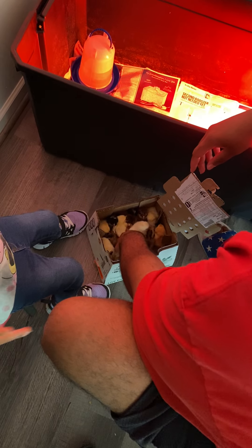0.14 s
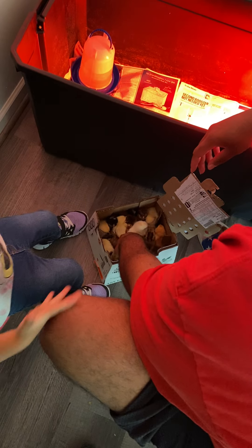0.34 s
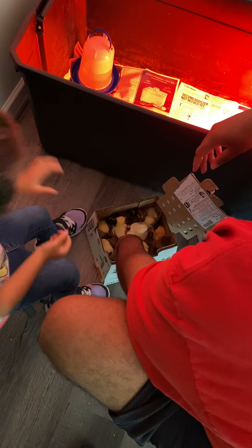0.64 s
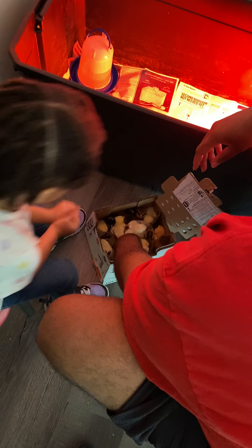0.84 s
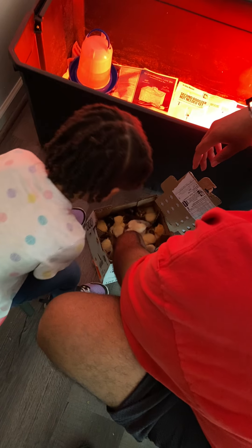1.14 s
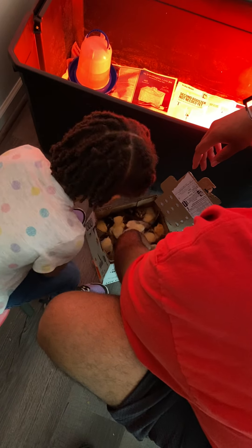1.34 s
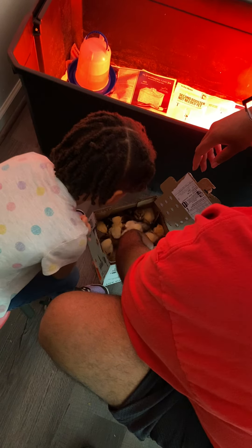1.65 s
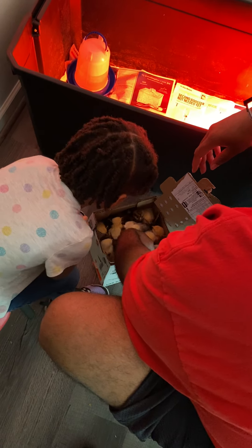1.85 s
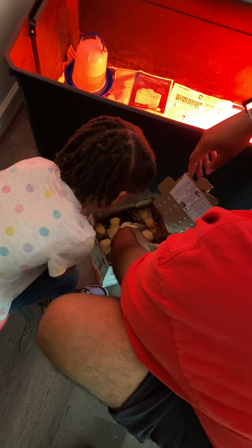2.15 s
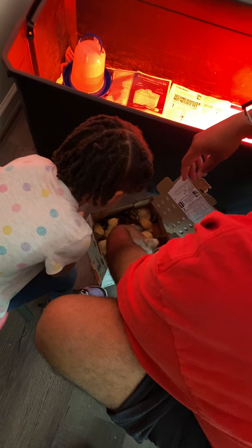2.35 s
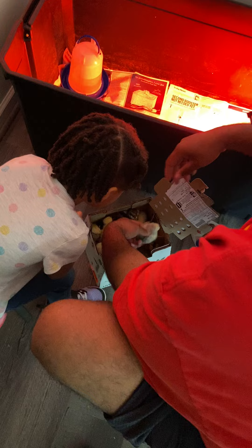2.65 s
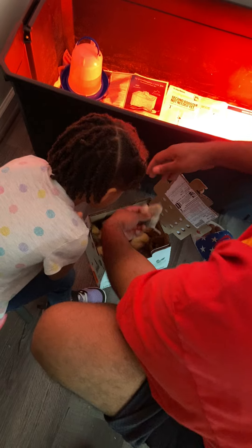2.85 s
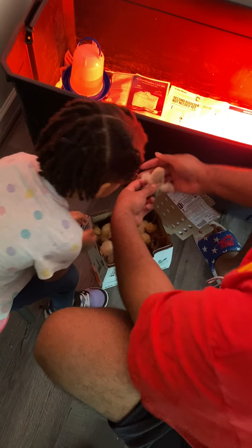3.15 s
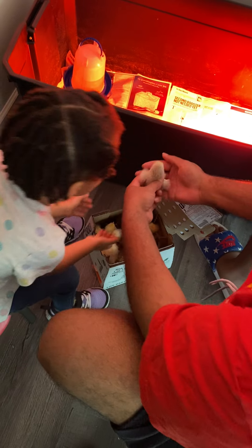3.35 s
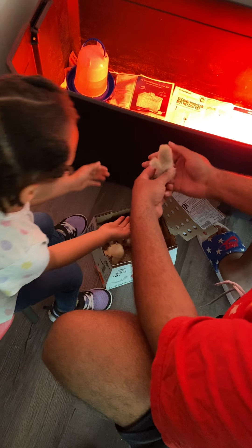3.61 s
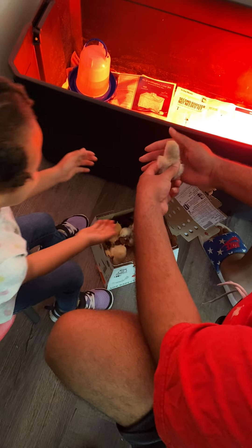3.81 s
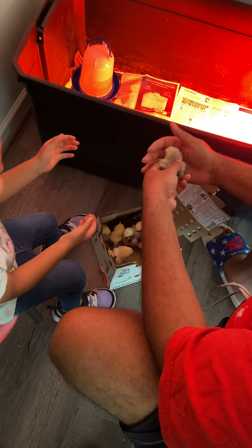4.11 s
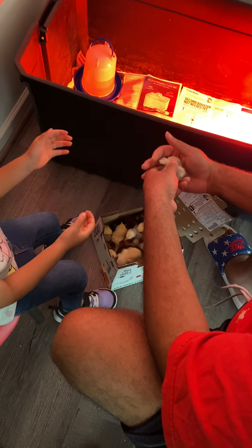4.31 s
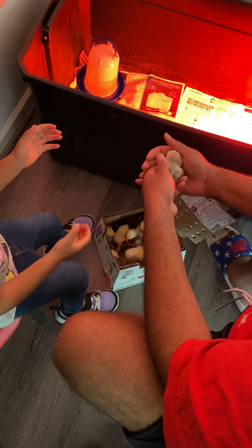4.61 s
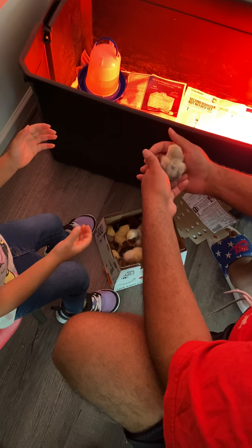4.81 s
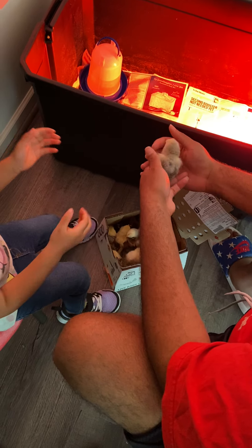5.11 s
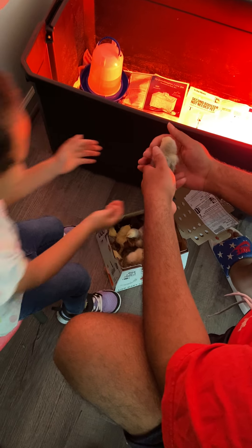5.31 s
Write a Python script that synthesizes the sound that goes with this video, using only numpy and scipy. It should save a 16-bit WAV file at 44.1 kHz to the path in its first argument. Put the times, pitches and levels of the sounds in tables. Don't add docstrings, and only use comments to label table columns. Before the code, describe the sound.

Many tiny chicks cheep shrilly over one another in a small room while feet shuffle, cardboard scrapes and something thumps dully.

```python
import sys
import numpy as np
from scipy import signal
from scipy.fft import rfft, irfft
from scipy.io import wavfile
from scipy.ndimage import uniform_filter1d

SR = 44100
rng = np.random.default_rng(int(sys.argv[2]) if len(sys.argv) > 2 else 0)


def wrap_up_sound(samples):
    columns = np.atleast_2d(samples).T
    tamed = np.clip(columns, -1, 1)
    steps = np.round(tamed * 32767).astype(np.int16)
    wavfile.write(sys.argv[1], SR, steps)


def volts_from_db(level):
    exponent = np.asarray(level, float) / 20
    return 10 ** exponent


N = 241182


def in_time(rows):
    s, *columns = np.transpose(rows)
    return [np.interp(np.arange(N) / SR, s, c) for c in columns]


def at_hz(points, hz):
    point_hz, level_db = np.transpose(points)[:2]
    return np.interp(np.log(hz + 1), np.log(point_hz), level_db)


def rms_one(x):
    return x / np.sqrt(np.mean(x ** 2) + 1e-20)


def band(x, low_hz, high_hz):
    return signal.sosfilt(signal.butter(2, [low_hz, high_hz], "band", fs=SR, output="sos"), x)


def drift(rate_hz, size=N):
    steps = rng.standard_normal(N // 8)
    return np.interp(np.arange(size) * rate_hz / SR, np.arange(len(steps)), steps) * np.sqrt(1.5)


def pair(middle, other, spread_db):
    side = volts_from_db(spread_db) * band(other, 420, 9500)
    return np.array([middle + side, middle - side])


def air():
    # f/Hz, level/dB per Hz
    air_colour = [(25, -17), (60, 9.5), (300, -11), (520, -16.5), (1200, -36), (2300, -37)]
    hz = np.fft.rfftfreq(N, 1 / SR)
    middle, other = irfft(rfft(rng.standard_normal((2, N))) * volts_from_db(at_hz(air_colour, hz)), N)
    hum_hz = 335 + 2.0 * drift(24.39)
    hum_db = -62.5 + 0.74 * drift(17.0)
    hum = np.sin(2 * np.pi * np.cumsum(hum_hz) / SR) * volts_from_db(hum_db)
    return volts_from_db(-63) * rms_one(pair(middle, other, spread_db=12.0)) + hum


def footfalls():
    # t/s, peak level/dB
    steps = [
        (0.76, -45.5),
        (1.1, -52),
        (1.6, -45.5),
        (2.048, -42.5),
        (2.45, -50.5),
        (2.9, -52.5),
        (3.2, -69),
        (4.78, -51),
        (5.0, -46),
        (5.4, -52),
    ]
    rise_db_per_s, fall_db_per_s, still_db = 127, 37, -93
    step_s, peak_db = np.transpose(steps)
    since = np.arange(N) / SR - step_s[:, None]
    drop_db = np.where(since < 0, -since * rise_db_per_s, since * fall_db_per_s)
    each_db = peak_db[:, None] - drop_db
    floor_db = np.maximum(each_db.max(axis=0), still_db)
    return rms_one(band(rng.standard_normal(N), 50, 66)) * volts_from_db(floor_db + 1.5 * drift(8))


def shuffling(shuffle_db):
    return rms_one(band(rng.standard_normal(N), 116, 348)) * volts_from_db(shuffle_db + 2.0 * drift(16))


def scraping(shuffle_db, grains):
    scrape_db = -79.5 + 3 * (shuffle_db + 56.0)
    white = rng.standard_normal((2, N))
    scrape = pair(band(white[0] * grains, 400, 1600), band(white[1] * grains, 500, 1800), spread_db=-2)
    slips = volts_from_db(3.5 * drift(25))
    return rms_one(scrape) * slips * volts_from_db(scrape_db)


def litter_rustle(grains):
    # t/s, level/dB
    stirring = [(0, -72), (.95, -72), (1.25, -69), (1.62, -67), (1.75, -56.5), (1.95, -69), (2.2, -56.5),
                (2.42, -64.5), (2.55, -73), (2.85, -64), (3.3, -64.5), (4.0, -72), (4.85, -83.5),
                (5.25, -63.5), (5.47, -59.5)]
    rustle = band(rng.standard_normal(N) * grains, 2660, 9240)
    scratching = volts_from_db(4 * drift(14))
    return rms_one(rustle) * scratching * volts_from_db(in_time(stirring)[0] - 0.5)


def movement():
    # t/s, shuffle level/dB
    moves = [(0, -61.5), (0.6, -67.5), (0.72, -61), (0.9, -60), (1.15, -53), (1.35, -61), (1.6, -54),
             (1.8, -52), (2.0, -56), (2.3, -61.5), (3.1, -64.5), (4.6, -65.5), (4.85, -58), (5.1, -62.5),
             (5.3, -56)]
    shuffle_db, = in_time(moves)
    snap_db = 5 + 2.5 * np.minimum(rng.exponential(1, N), 4)
    grains = 1 + (rng.random(N) < 600 / SR) * volts_from_db(snap_db)
    return footfalls() + shuffling(shuffle_db) + scraping(shuffle_db, grains) + litter_rustle(grains)


def drags():
    # middle t/s, length/s, pitch f/Hz, width/Hz, level/dB
    rubs = [(1.14, 0.075, 797, 90, -63), (1.62, 0.16, 294, 29.7, -49.5), (1.76, 0.055, 1490, 200, -56),
            (2.422, 0.022, 890, 400, -67), (2.648, 0.35, 580, 175, -63.5), (3.047, 0.3, 1060, 910, -70),
            (3.737, 0.033, 1250, 900, -71.5), (4.856, 0.089, 520, 196, -62), (5.24, 0.17, 1710, 402, -69.5),
            (5.35, 0.096, 163, 81, -45), (.68, .1, 151, 60, -54.5), (2.05, 0.19, 150, 49.4, -48.5),
            (2.26, 0.13, 140, 60, -52.5), (1.8, .17, 850, 90, -62.5), (1.78, .2, 458, 60, -53.5),
            (2.88, .14, 186, 39.6, -59.5)]
    out, t = np.zeros(N), np.arange(N) / SR
    for s, length_s, hz, width_hz, level_db in rubs:
        near = np.abs(t - s) < length_s / 2
        noise = band(rng.standard_normal(SR // 2), hz - width_hz / 2, hz + width_hz / 2)
        rub = rms_one(noise[-near.sum():])
        out[near] += volts_from_db(level_db) * rub * np.cos(np.pi * (t[near] - s) / length_s)
    return out


def knocks():
    # t/s, peak level/dB, pitch f/Hz
    bumps = [(0.385, -36.5, 158), (1.12, -31.5, 236), (1.556, -34, 322), (1.709, -25.5, 280),
             (1.747, -30, 308), (1.795, -21.5, 265.5), (1.97, -43, 163), (2.412, -42, 129),
             (3.809, -36.5, 312), (4.819, -55, 238), (5.304, -35, 165)]
    # t/s, peak level/dB
    ticks = [
        (.977, -59.5),
        (1.188, -64),
        (1.703, -53.5),
        (1.722, -56.5),
        (2.002, -62),
        (2.067, -56.5),
        (2.0977, -55),
    ]
    out, t = np.zeros(N + SR), np.arange(SR // 4) / SR
    for s, peak_db, hz in bumps:
        puff = rms_one(band(rng.standard_normal(len(t)), 120, 910)) * volts_from_db(-19.0 - 60 * t / 0.21)
        note = np.sin(2 * np.pi * hz * t) * volts_from_db(-60 * t / 0.057) * np.minimum(t / 0.0076, 1)
        out[round(s * SR):][:len(t)] += volts_from_db(peak_db - 6.5) * (note + puff)
    for s, peak_db in ticks:
        tick = rms_one(band(rng.standard_normal(len(t)), 1600, 12000)) * volts_from_db(-60 * t / 0.04)
        out[round(s * SR):][:len(t)] += volts_from_db(peak_db + 5.0) * tick
    return out[:N]


def room(x):
    t = np.arange(SR // 2) / SR
    noise = rng.standard_normal((2, len(t))) * (t > .0015)
    early = (rng.random(len(t)) < 700 / SR) * volts_from_db(27.5 - 60 * t / 0.097)
    dull = band(noise, 40, 7000)
    low = band(dull, 40, 4200)
    clumps = volts_from_db(2.5 * np.array([drift(68.6, size=len(t)), drift(70, size=len(t))]))
    low_s, upper_s, bright_s = 0.41, 0.39, 0.015
    late = clumps * (low * volts_from_db(-60 * t / low_s) + (dull - low) * volts_from_db(-60 * t / upper_s))
    late += band(noise, 7000, 16000) * volts_from_db(-60 * t / bright_s)
    tail = signal.lfilter([1], [1, -.3], late + noise * early)
    tail = pair(tail[0], tail[1], spread_db=-1.5)
    tail /= np.sqrt(np.sum(tail[0] ** 2))
    return signal.fftconvolve(x[None], tail, axes=1)[:, :N]


def throat_hiss(voices):
    effort = np.sqrt(uniform_filter1d(voices ** 2, size=900) + 1e-12)
    noise = rms_one(band(rng.standard_normal(N), 5100, 6200))
    bright = rms_one(band(rng.standard_normal(N), 8300, 12300))
    return volts_from_db(-42) * effort ** .8 * noise + volts_from_db(-41.5) * effort * bright


def whistle_peep(out, rows, gape_db):
    # f/Hz, level/dB
    box = [(2000, -1.5), (2600, -2), (3200, 1.5), (3900, 3), (4600, 0), (5200, 3), (6200, 4)]
    # f/Hz, level against the main tone/dB
    beak = [(4600, -15), (5600, -15.5), (6600, -19.5), (7200, -20.5), (9500, -31.5), (11500, -24),
            (13000, -43.5), (15000, -65)]
    s, pitch_hz, level_db = np.transpose(rows)
    fade = 0.0077
    at = np.arange(max(round((s[0] - fade) * SR), 0), min(round((s[-1] + fade) * SR), N))
    t = at / SR
    hz = uniform_filter1d(np.interp(t, s, pitch_hz), size=260)
    edge = np.clip(np.minimum(t - s[0] + fade, s[-1] + fade - t) / (2 * fade), 0, 1)
    wobble = drift(150.9, size=len(t))
    phase = 2 * np.pi * np.cumsum(hz * (1 + 0.00545 * wobble)) / SR
    tone = volts_from_db(at_hz(box, hz)) * np.sin(phase)
    for k in (2, 3, 4):
        gape = gape_db * np.interp(k * hz, [6900, 7500], [1, .4])
        overtone_db = at_hz(beak, k * hz) + gape - 4 * (k - 1.5)
        tone += volts_from_db(overtone_db) * np.sin(k * phase)
    tone *= np.sqrt(2) * volts_from_db(np.interp(t, s, level_db) - 1.38 + 2.99 * wobble) * edge ** 2
    wall = rng.integers(60, 330)
    tone[wall:] += volts_from_db(-19.0) * tone[:-wall]
    far = rng.integers(350, 800)
    tone[far:] += volts_from_db(-22.0) * tone[:-far]
    out[:, at] += tone * volts_from_db(np.array([[-.5], [.5]]) * rng.normal(0, 1.0))


def peep(shape, knee_s, lead_s, top_hz, peak_db):
    when, share, level_db = np.transpose(shape)
    s = np.sort(knee_s + np.where(when < 0, when * abs(lead_s), when))
    return np.transpose([s, share * top_hz, peak_db + level_db])


def call_out(out, shape, calls):
    for *call, gape_db in calls:
        whistle_peep(out, peep(shape, *call), gape_db)




def buried_chicks(out):
    swoop = [(-1, .99, -7), (-.5, 1.0, -5), (0, .92, -2), (.025, .775, 0), (.046, .6, -8)]
    swoops = [(0.046, 0.035, 4490, -63), (0.206, 0.067, 4780, -60), (2.445, .015, 4560, -52.5),
              (3.555, .04, 3766, -48.5), (4.107, .017, 3610, -47), (0.657, 0.06, 5290, -58),
              (3.36, .02, 4100, -56), (0.673, 0.039, 4450, -50.5), (0.908, 0.017, 4410, -55),
              (1.16, 0.058, 4370, -54), (1.265, 0.05, 4320, -48), (1.807, .012, 4040, -69),
              (2.919, 0.026, 4450, -54), (2.96, 0.089, 4570, -50), (3.05, 0.0043, 4520, -51),
              (3.3, .014, 4100, -59), (3.391, .03, 5860, -58), (3.245, .02, 4210, -57.5),
              (4.035, 0.021, 3920, -57.5), (4.184, 0.051, 4700, -48.5), (4.402, 0.031, 4190, -58),
              (4.454, 0.021, 4130, -56.5), (4.501, 0.015, 4640, -48.5), (4.785, 0.097, 4437, -50.5),
              (4.85, 0.018, 4250, -57), (.735, 0.024, 4900, -54)]
    droop = [(-1, 1.0, -9), (-.5, .94, -7), (0, .85, -2), (.02, .76, 0), (.04, .585, -7)]
    droops = [(.13, 0.036, 3900, -40), (0.3836, 0.097, 4100, -51), (1.562, 0.063, 4000, -55.5),
              (2.111, 0.16, 3980, -51.5), (2.44, 0.048, 3950, -51), (2.522, 0.033, 3700, -44.5),
              (2.865, 0.055, 3900, -46), (3.226, 0.057, 3900, -49), (4.968, 0.033, 3580, -46),
              (5.326, 0.11, 4160, -50), (1.64, 0.035, 4900, -45.5), (2.4, 0.074, 4530, -55),
              (3.1, 0.062, 4600, -56), (1.9, .03, 6600, -56), (1.62, .05, 4800, -65),
              (2.38, 0.033, 4400, -59), (4.161, 0.011, 4200, -60), (1.402, 0.054, 4200, -59),
              (3.79, 0.097, 3860, -56.5)]
    whistle = [(-1, .97, -6), (-.6, 1.0, -3), (-.25, .985, -2), (0, .93, 0)]
    whistles = [(0.088, 0.082, 5040, -58.5), (0.38, 0.094, 5010, -66.5), (0.337, 0.032, 4100, -67),
                (.6, 0.033, 5750, -67), (1.244, 0.057, 5570, -64.5), (1.285, 0.039, 5390, -54),
                (1.5, 0.026, 5250, -63), (1.62, .08, 5030, -57), (1.641, .08, 4470, -58),
                (1.74, 0.076, 4875, -41.5), (2.15, 0.062, 4670, -54), (2.56, 0.063, 4030, -51.5),
                (2.565, .08, 4700, -62), (2.819, .09, 3430, -55.5), (2.99, 0.066, 5460, -62.5),
                (3.299, 0.049, 5450, -65), (3.351, .03, 5100, -48), (3.41, 0.047, 5400, -50.5),
                (3.858, 0.055, 5330, -47), (4.235, 0.056, 5120, -46.5), (4.161, 0.045, 5400, -62),
                (4.491, 0.058, 4620, -57.5), (4.599, .06, 4100, -56), (4.964, 0.078, 4054, -44),
                (3.049, 0.089, 4650, -52), (5.251, 0.071, 6200, -66)]
    for shape, calls in [(swoop, swoops), (droop, droops), (whistle, whistles)]:
        for call in calls:
            whistle_peep(out, peep(shape, *call), gape_db=2.0)
    for moment, lead, pitch, strength in rng.random((50, 4)):
        shape = droop if lead > .5 else swoop
        rows = peep(shape, moment * N / SR, .02 + .08 * lead, 3600 + 1800 * pitch, -69 + 7 * strength)
        whistle_peep(out, rows, gape_db=3)


def chirping_chicks(out):
    chirp = [(-1.8, 1.1, 1.5), (0, .95, -2.5), (0.0197, .82, -0.5), (0.046, 0.6646, -10)]
    chirps = [(0.737, 0.0056, 3616, -41.5, -3), (1.129, 0.029, 3790, -56, 14),
              (1.612, 0.003, 3590, -49.5, -16), (1.757, 0.0079, 3490, -39.5, 12.5),
              (3.666, 0.0056, 3560, -39, -5), (3.697, 0.01, 3576, -46.5, 4.5), (3.938, 0.011, 3763, -43, 3),
              (4.707, 0.003, 3770, -39, 3), (5.118, 0.004, 3770, -38.5, -7),
              (5.18, 0.029, 3860, -51.5, -24), (0.569, 0.014, 3720, -86, 19), (3.422, 0.036, 3500, -58, 11),
              (0.11, 0.004, 3280, -55, -3), (1.773, 0.0099, 3550, -43, 8), (3.255, .008, 3410, -61, -3),
              (4.135, .01, 4130, -49.5, 13)]
    call_out(out, chirp, chirps)


def sliding_chick(out):
    slide = [(-1, .975, -17), (-.8, .99, -12), (-.62, .94, -8), (-.42, .83, -3), (0, .69, 0),
             (.031, .45, -6)]
    slides = [
        (.268, 0.13, 5705, -46, 6),
        (0.736, 0.12, 5653, -46, 9),
        (1.058, 0.105, 5730, -43.5, 4),
        (1.466, 0.1, 5800, -45.5, 8),
        (3.255, 0.072, 5620, -59, -1),
        (3.64, 0.075, 5740, -55.5, 12),
    ]
    call_out(out, slide, slides)


def diving_chicks(out):
    dive = [(-1, .985, -16), (-.6, 1.0, -12), (0, .95, -9), (.028, .735, 0), (.062, .47, -14)]
    dives = [
        (0.016, 0.037, 6130, -60.5, 24),
        (1.985, .07, 5600, -59.5, 0),
        (2.189, 0.032, 4170, -41, 4),
        (2.568, 0.049, 4350, -39, 2),
        (2.992, 0.1, 4380, -36, -10),
        (4.614, 0.056, 4210, -38, 22.5),
        (5.016, 0.017, 4000, -40, 12.5),
    ]
    call_out(out, dive, dives)


def cracking_chick(out):
    crack = [(-1, .95, -21), (-0.754, 0.99, -14.5), (-0.44, 0.98, -6), (0, .865, 1.5), (.009, .64, -0.5),
             (.035, .57, -6.5), (.06, 0.39, -21)]
    cracks = [
        (0.446, 0.08, 4526, -44.5, 19),
        (0.911, 0.1, 4830, -39.5, 13),
        (1.314, .11, 4910, -36.5, 15),
        (1.8, 0.14, 4746, -39, 8),
        (3.378, 0.095, 4626, -33.5, 6),
        (3.807, 0.1, 4590, -36, 8),
        (4.237, 0.038, 4530, -35, 7.5),
        (5.405, 0.079, 4560, -36, 7.5),
    ]
    call_out(out, crack, cracks)


def loudest_chick(out):
    arch = [(-1, .91, -16), (-.82, 0.96, -17), (-0.568, 0.99, -9), (-.28, .97, -7), (0, .86, 0),
            (.028, .645, -1.5), (0.069, .46, -22)]
    arches = [
        (2.286, 0.11, 4690, -38, 13),
        (3.444, 0.1, 4984, -25.5, 8),
        (3.871, 0.082, 4875, -27.5, 12),
        (4.985, .11, 4574, -28.5, 4.5),
        (5.332, 0.1, 4544, -28.5, 3.5),
    ]
    kink = [(-1, .91, -16), (-.82, .97, -11), (-.6, 1.0, -8), (-.3, .98, -3), (0, .875, 0), (.011, .72, -4),
            (.035, .62, -3), (.06, .44, -18)]
    kinks = [
        (0.452, 0.14, 4660, -35.5, 13),
        (0.867, 0.12, 4614, -38, 11),
        (3.095, 0.112, 4900, -28.5, 11.5),
        (4.625, 0.11, 4634, -26.5, -5),
    ]
    crest = [(-1, .875, -10), (-.8, .95, -7), (-.36, 1.0, -2), (0, .905, 0), (.014, .7, -1), (.03, .6, -4),
             (.046, .48, -10)]
    crests = [
        (4.286, .11, 4739, -30.5, 14),
    ]
    hold = [(-1, .91, -22), (-.75, .985, -10), (-.45, 1.0, -6), (-.18, .97, -3), (0, .885, 0),
            (.01, .68, -3), (.034, .66, -7), (.06, .45, -18)]
    holds = [
        (2.681, 0.13, 4893, -31.5, 20.4),
    ]
    for shape, calls in [(arch, arches), (kink, kinks), (crest, crests), (hold, holds)]:
        call_out(out, shape, calls)


def chicks():
    out = np.zeros((2, N))
    buried_chicks(out)
    chirping_chicks(out)
    sliding_chick(out)
    diving_chicks(out)
    cracking_chick(out)
    loudest_chick(out)
    return out


def scene():
    voices = chicks()
    close = voices + throat_hiss(voices[0]) + knocks()
    echoes = volts_from_db(-5) * room(close.mean(axis=0))
    return close + echoes + air() + movement() + drags()


def low_pass(x):
    return signal.sosfilt(signal.butter(12, 15750, fs=SR, output="sos"), x)


def record(dry):
    # f/Hz, level/dB
    port_dip = [(6600, 0), (7100, -13.5), (7900, -1), (8500, -0.5)]
    # f/Hz, lag/radians
    port_lag = [(0, 0), (4200, 1.05), (5200, .8), (7000, 2.6), (7800, 3.6), (16600, 12.56)]
    # f/Hz, level/dB
    port_gain = [(1600, 0), (3000, 1), (4600, 2.5), (5600, 0)]
    hz = np.fft.rfftfreq(N, 1 / SR)
    middle = rfft(dry[0] + dry[1]) / 2 * volts_from_db(at_hz(port_dip, hz))
    side = rfft(dry[0] - dry[1]) / 2 / (1 + (hz / 5200) ** 12)
    lag = np.interp(hz, *np.transpose(port_lag))
    left = middle + side
    right = (middle - side) * volts_from_db(at_hz(port_gain, hz)) * np.exp(-1j * lag)
    return low_pass(irfft([left, right], N))


dry = scene()
out = record(dry)
wrap_up_sound(out)
```